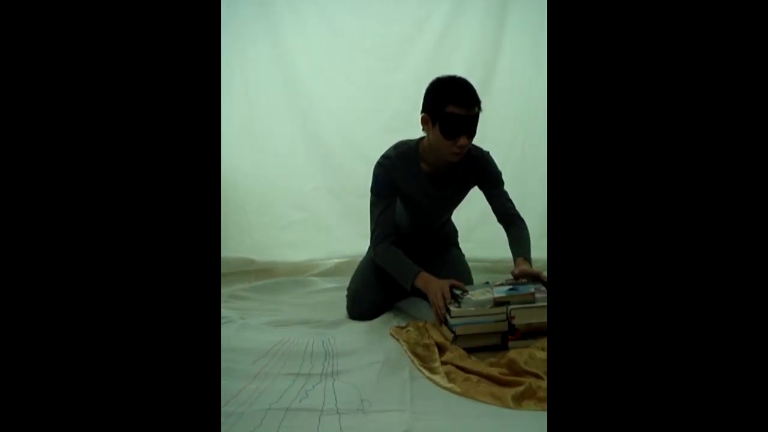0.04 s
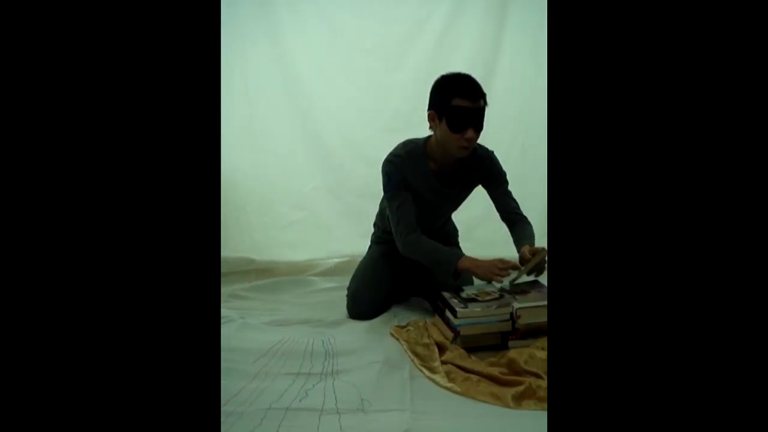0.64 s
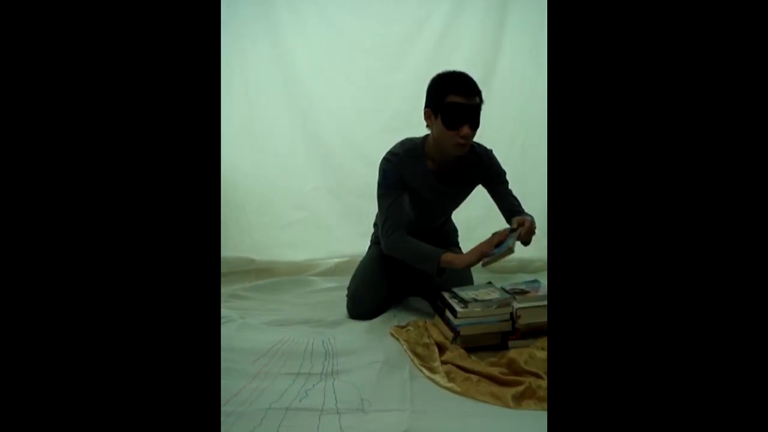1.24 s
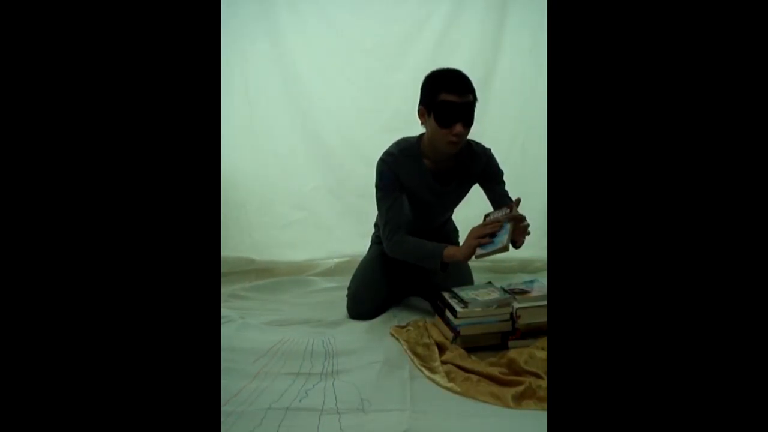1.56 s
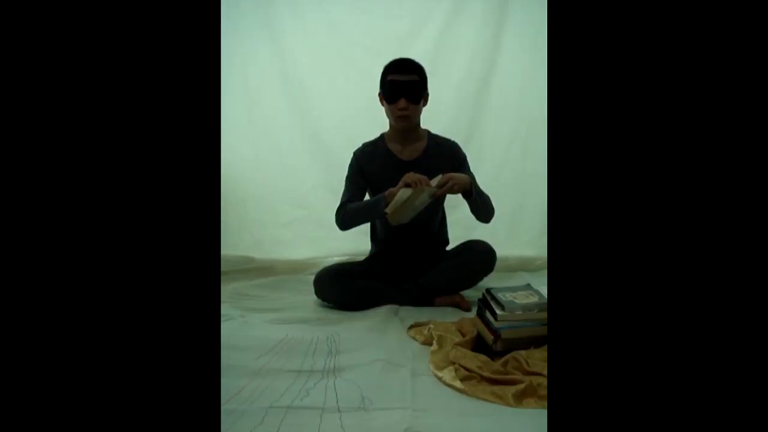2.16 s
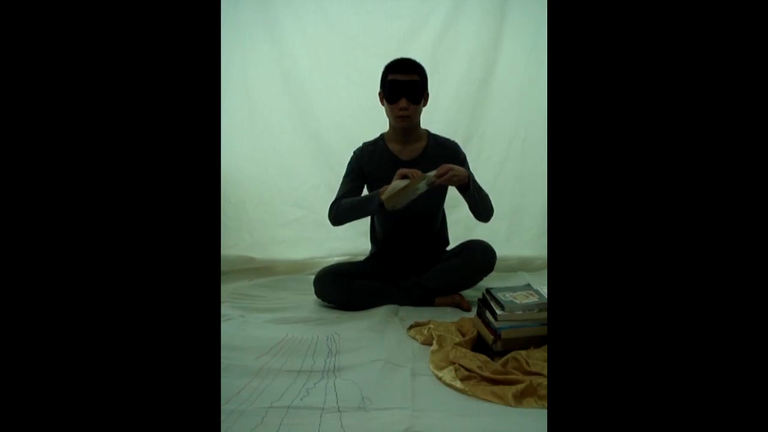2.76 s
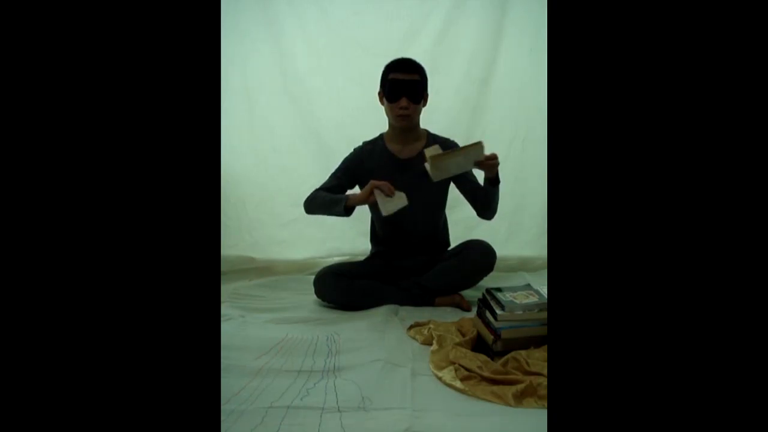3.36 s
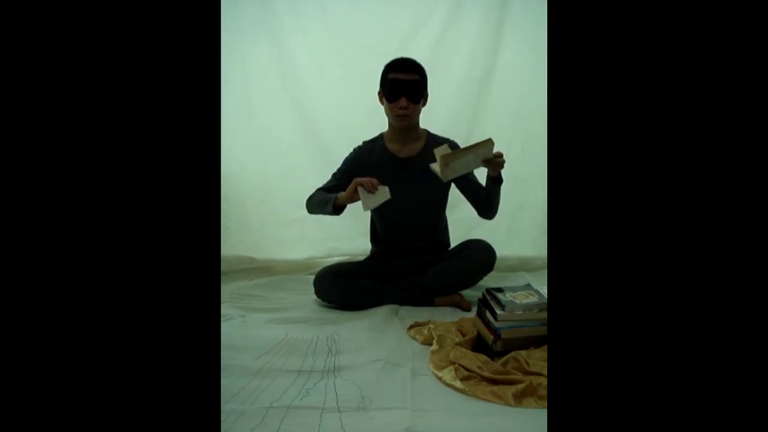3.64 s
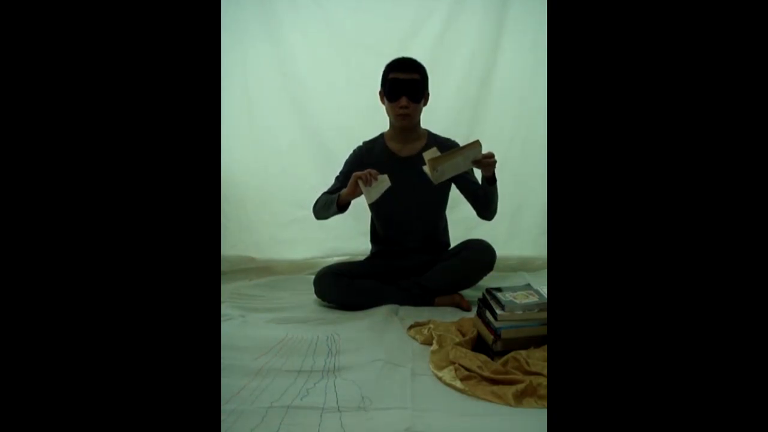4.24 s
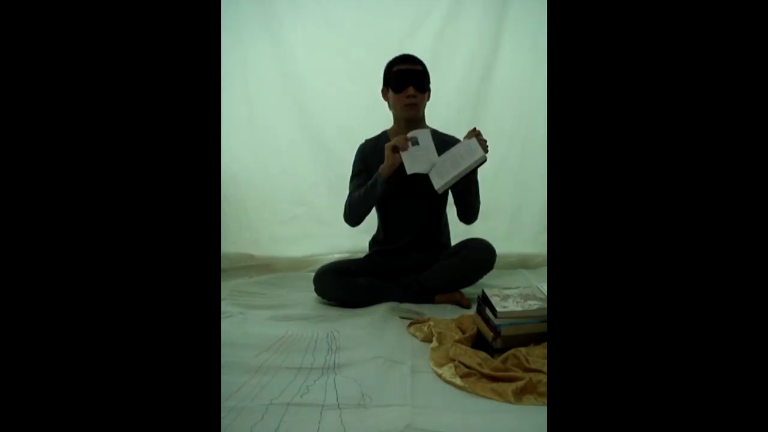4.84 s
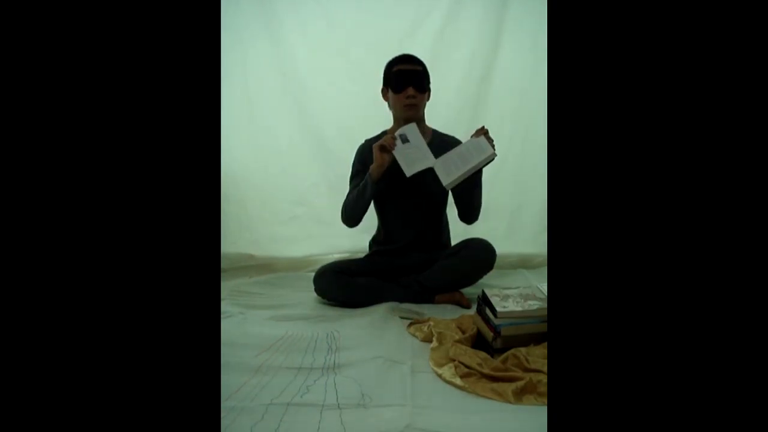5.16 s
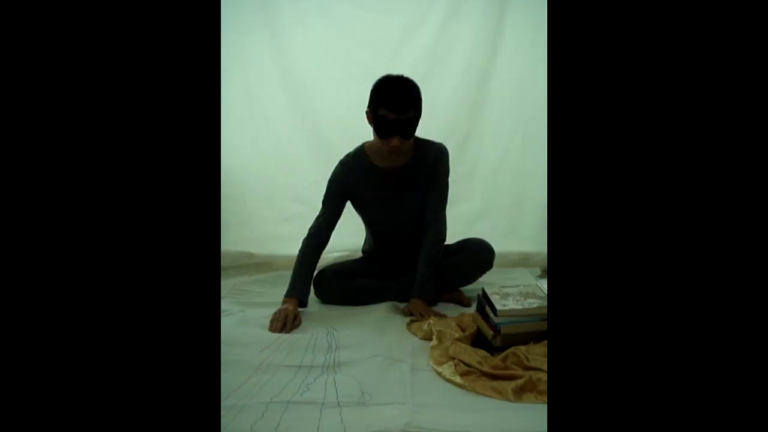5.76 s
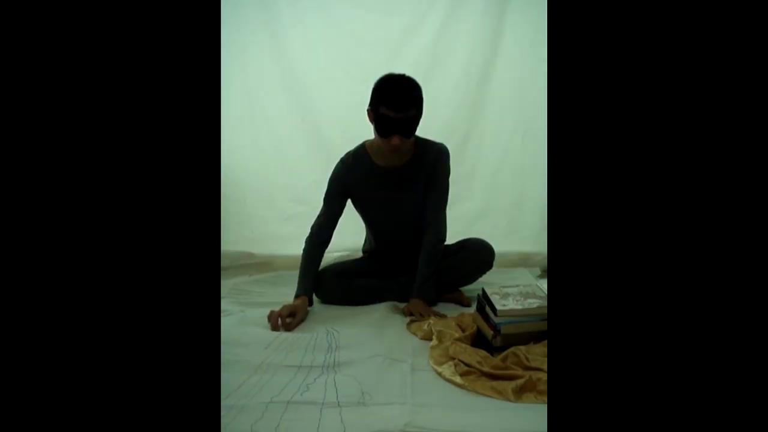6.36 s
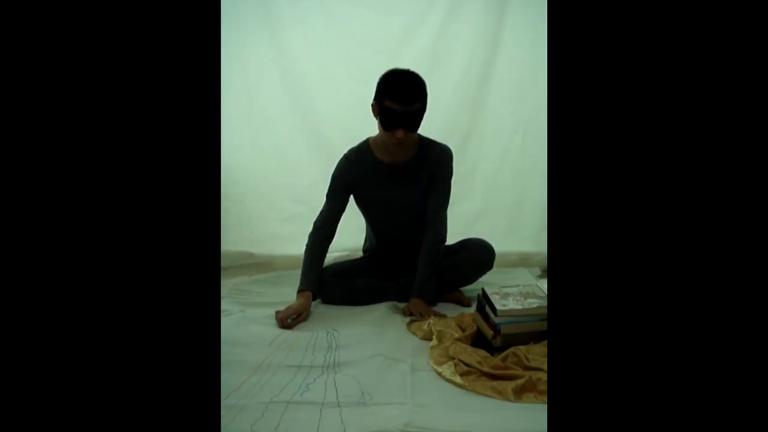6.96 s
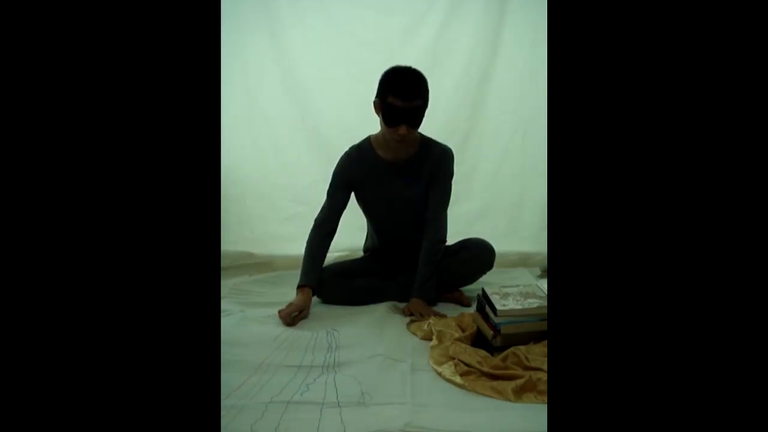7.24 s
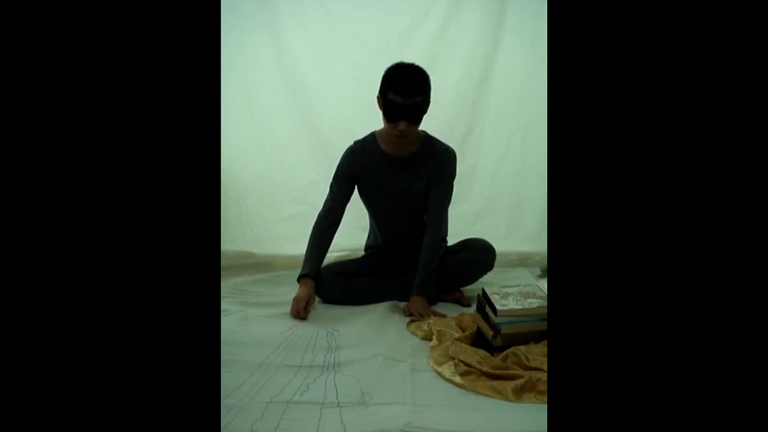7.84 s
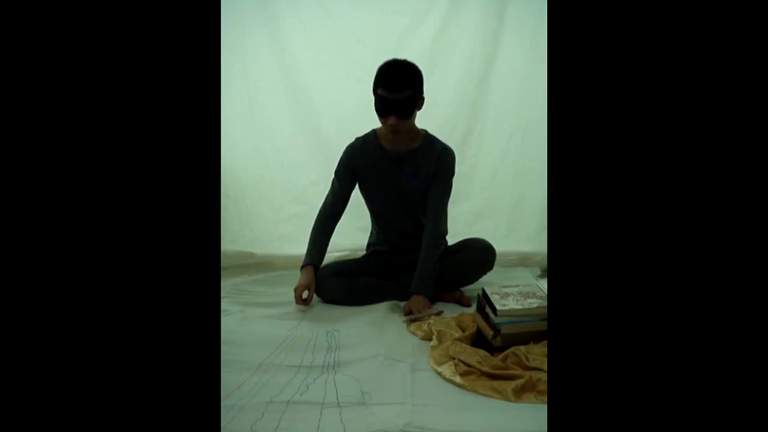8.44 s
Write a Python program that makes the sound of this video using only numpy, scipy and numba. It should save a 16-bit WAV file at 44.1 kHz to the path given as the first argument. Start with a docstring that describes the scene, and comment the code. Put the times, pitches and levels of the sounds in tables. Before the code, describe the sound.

In a small, bare room, a hand bumps softly on a cloth-covered floor. A book's binding cracks sharply and a wad of pages rips away with a harsh rasp. After a pause, a single leaf snaps and tears more quietly. The hand then bumps harder, juddering with a few short squeaks, before the knocks grow lighter. The microphone picks up a short echo and faint hiss and hum throughout.

```python
"""Pages are torn out of a book in a small, bare room: the binding snaps, a wad rips away, then one leaf.
Breaking fibres rasp and shake the loose flap of paper, whose ringing pitch moves as the rip runs on.
A hand bumps the cloth-covered floor, softly at first; after the tearing it bumps harder and judders,
with short squeaks. A faint room hiss and hum lie under it all."""
import sys
import numpy as np
from scipy import signal
from scipy.fft import rfft, irfft
from scipy.io import wavfile
from numba import njit

SR = 44100
rng = np.random.default_rng(int(sys.argv[2]) if len(sys.argv) > 2 else 0)


def to_wav(sig):
    """Store sig (one row per channel, or 1-D mono) as 16-bit WAV at the path in sys.argv[1].

    Samples outside -1..1 are clipped; the rate is SR.
    """
    pcm = np.clip(np.atleast_2d(sig), -1, 1) * 32767
    pcm = np.round(pcm).astype(np.int16)
    wavfile.write(sys.argv[1], SR, pcm.T)  # frames by channels


N = 384111
T = np.arange(N) / SR

# how long the room's echo takes to fade by 60 dB: pitch_hz, fade_s
ECHO_FADE = [(150, 0.43), (500, 0.43), (1000, 0.39), (2100, 0.43), (3600, 0.36), (9000, 0.27)]


def undb(db):
    """Turn decibels into a number to multiply by."""
    return 10 ** (np.asarray(db) / 20)


def unit(x):
    """Scale x to an average strength (rms) of 1."""
    return x / np.sqrt(np.mean(x ** 2) + 1e-20)


def along(points, hz):
    """Read a value between (pitch_hz, value) points, with octaves evenly spaced."""
    pitches, values = np.transpose(points)
    return np.interp(np.log(hz + 1), np.log(pitches), values)


def response(points, size=2048):
    """A click of peak 1 with the tone colour given by (pitch_hz, level_db) points."""
    hz = np.arange(size // 2 + 1) * SR / size
    cepstrum = irfft(np.log(undb(along(points, hz))))
    cepstrum[1:size // 2] *= 2  # this line and the next move the energy to the click's start
    cepstrum[size // 2 + 1:] = 0
    click = irfft(np.exp(rfft(cepstrum)))
    return click / np.abs(click).max()


def ring(x, click):
    """Let every sample of x set off a copy of the click or echo."""
    return signal.oaconvolve(x, click)[:len(x)]


def colour(x, points):
    """Give x a tone colour, at strength 1."""
    return unit(ring(x, response(points)))


def add(out, start_s, x):
    """Mix x into out from start_s on."""
    i = max(int(start_s * SR), 0)
    out[i:i + len(x)] += x[:max(N - i, 0)]


def wander(rate_hz, size=4096):
    """A random curve of strength 1 that heads for a new value rate_hz times a second."""
    return unit(np.interp(T * rate_hz, np.arange(size), rng.standard_normal(size)))


def flip(x):
    """Point every sample up or down at random."""
    return np.where(rng.random(N) < .5, x, -x)


def swell(t, rise_s):
    """A soft push that peaks at 1 after rise_s and dies away."""
    return t / rise_s * np.exp(1 - t / rise_s)


def stroke(length_s, release_s, build_share=0.13):
    """The force of one stroke: it builds, holds until length_s and dies away."""
    t = T[:int((length_s + 10 * release_s) * SR)]
    build = np.minimum(t / (build_share * length_s), 1)
    return build * np.exp(-np.maximum(t - length_s, 0) / release_s)


@njit
def resonance(x, hz, width):
    """Keep the part of x near a moving pitch; width is a share of that pitch."""
    out = np.empty(len(x))
    band, low = 0., 0.
    for i in range(len(x)):
        tuning = np.tan(np.pi * hz[i] / SR)
        swing = (band + tuning * (x[i] - low)) / (1 + tuning * (tuning + width))
        band = 2 * swing - band
        low += 2 * tuning * swing
        out[i] = width * swing
    return out


def fibres(per_second, spread_db, catch_db):
    """Fibres break at random, most small and a few large, unevenly as the rip catches and runs."""
    breaks = rng.random(N) < per_second / SR
    size_db = spread_db * np.minimum(rng.exponential(size=N), 4) + catch_db * wander(260)
    return flip(breaks * undb(size_db))


def air():
    """Steady room hiss with a few faint, wavering hum tones."""
    # tone colour of the hiss: pitch_hz, level_db
    hiss_colour = [(15, -75), (25, -35.5), (48, -15), (195, -6), (221, -8), (257, -6.5), (384, -3.5),
                   (458, -6.5), (603, -8.5), (651, -8.5), (737, -8), (1770, -14.5), (2280, -16),
                   (7590, -21.5), (10000, -27), (13000, -112), (22000, -120)]
    # tones of the hum: pitch_hz, level_db
    hum_tones = [(59, -79.5), (226, -70), (377, -82), (598, -70), (7570, -89)]
    hiss = undb(-55.86) * colour(rng.standard_normal(N), hiss_colour)
    waver = undb(2 * wander(12))
    hum = np.zeros(N)
    for pitch_hz, level_db in hum_tones:
        cycles = np.cumsum(pitch_hz + 5 * wander(30)) / SR
        hum += undb(level_db) * unit(np.sin(2 * np.pi * cycles))
    return hiss + waver * hum


def echo_tail(size=32768):
    """One random wash of echoes with energy 1; each pitch range dies at its own pace."""
    t, hz = T[:size], np.arange(size // 2 + 1) * SR / size
    spectrum = rfft(rng.standard_normal(size))
    edges_hz = [0, 200, 400, 800, 1600, 2800, 4500, 7000, SR / 2]
    tail = np.zeros(size)
    for low, high in zip(edges_hz, edges_hz[1:]):
        band = irfft(spectrum * ((hz >= low) & (hz < high)))
        tail += band * undb(-60 * t / along(ECHO_FADE, (low + high) / 2))
    tail *= np.clip((t - .003) / 0.00076, 0, 1)  # silent for the first 3 ms
    return tail / np.sqrt(np.sum(tail ** 2))


def room(x, tail_db=-1.0, wall_db=-17.0, wall_s=.006, sway_hz=17, tails=3):
    """The room adds a first echo off a wall, its own ringing notes and a wash of later echoes."""
    # standing waves, the notes that ring between the walls: pitch_hz, level_db
    room_notes = [(254, 18), (481, 8.5), (819, -12), (1031, 14.5), (1248, 8), (1367, 9), (1636, 8),
                  (1843, 5.5), (1956, 8), (2241, 5), (2453, 9), (2591, 2.5), (2664, -3), (2875, 5),
                  (2984, 6.5), (3358, 4)]
    t = T[:SR // 2]
    echo = np.zeros(len(t))
    echo[0] = 1  # the direct sound
    add(echo, wall_s, undb([wall_db]))
    for pitch_hz, level_db in room_notes:
        damping = np.log(1000) / along(ECHO_FADE, pitch_hz)
        note = np.exp(-damping * t) * np.cos(2 * np.pi * pitch_hz * t)
        echo += undb(level_db) * 2 * damping / SR * note
    out = ring(x, echo)
    # flapping paper and moving hands keep changing which echoes they feed
    for k in range(tails):
        share = (1 + np.cos(2 * np.pi * (sway_hz * T + k / tails))) / tails
        out += undb(tail_db) * ring(x * np.sqrt(share), echo_tail())
    return out


def sliding():
    """Cloth and paper hiss as they slide."""
    # sliding strokes: start_s, length_s, level_db
    slides = [(2.255, 0.051, -58), (6.391, 0.025, -41), (7.695, 1., -66), (8.573, 0.043, -59)]
    # tone colour of their hiss: pitch_hz, level_db
    slide_colour = [(1000, -4), (3500, -14.5), (4800, -0.5), (5700, 1.5), (6600, -3.5), (7800, -9.5),
                    (10000, -30)]
    loudness = np.zeros(N)
    for start_s, length_s, level_db in slides:
        add(loudness, start_s, undb(level_db - 2.8) * stroke(length_s, release_s=0.01))
    return loudness * colour(fibres(5000, spread_db=1.8, catch_db=1.0), slide_colour)


def skin_squeaks(sag_share=0.15, waver_share=0.057):
    """Skin sticks and slips on the floor in unsteady squeaks whose pitch sags as the pressure goes."""
    # squeaks: start_s, length_s, pitch_hz, level_db
    squeaks = [(6.387, 0.023, 1089, -29), (6.431, 0.019, 1100, -30.5), (6.511, 0.015, 1187, -40)]
    out = np.zeros(N)
    waver = 1 + waver_share * wander(300)
    for start_s, length_s, pitch_hz, level_db in squeaks:
        force = stroke(length_s, release_s=0.0071)
        hz = pitch_hz * (1 - sag_share * (1 - force)) * waver[int(start_s * SR):][:len(force)]
        tone = np.sqrt(2) * np.sin(2 * np.pi * np.cumsum(hz) / SR)
        add(out, start_s, undb(level_db - 8) * force * tone)
    return out * undb(wander(220))  # the level flutters by about 1 dB


def hand_touches(gap_s=.011, end_fade_db=11.5, scatter_db=1, scatter_octaves=0.21, repeats=7):
    """A juddering hand lands, then touches again and again, ever more lightly."""
    # bumps of the hand: start_s, judder_s, level_db, pitch_hz, knock_db, scuff_db
    bumps = [(0.418, 0.01, -41.5, 398, -13, -13), (1.154, 0.013, -41, 385, -10, -22),
             (1.692, 0.02, -41, 388, -11, -15), (1.819, .015, -42, 393, -8, -12),
             (3.962, .02, -44, 387, -10, -15), (4.521, 0.0061, -44, 334, -9, -20),
             (6.188, 0.024, -22.5, 382, -8.5, -11.5), (6.212, 0.031, -27, 261, -2, -13.5),
             (6.331, 0.066, -32, 470, -3.5, -23), (6.39, 0.041, -25, 500, -11, -24),
             (6.467, 0.05, -27, 446, -0.5, -12.5), (6.582, 0.043, -30.5, 440, -18, -24),
             (6.626, 0.054, -32, 590, -4, -25), (6.706, 0.041, -29, 410, -11.5, -28),
             (7.172, 0.062, -36, 450, -20, -25), (7.269, 0.087, -37, 433, -15, -37),
             (7.68, 0.082, -42, 415, -16, -20), (7.786, 0.017, -35, 480, -19, -24),
             (8.223, 0.045, -37.5, 463, -15, -22), (8.589, 0.025, -42, 460, -20, -8)]
    for start_s, judder_s, level_db, pitch_hz, knock_db, scuff_db in bumps:
        yield start_s, level_db, pitch_hz, knock_db, scuff_db
        delay_s = 0
        for gap_luck, level_luck, pitch_luck in rng.standard_normal((repeats, 3)):
            delay_s += gap_s * np.exp(0.253 * gap_luck)
            fade_db = end_fade_db * (delay_s / judder_s) ** 2
            if fade_db < 40:
                touch_db = level_db - fade_db + scatter_db * level_luck
                touch_hz = pitch_hz * 2 ** (scatter_octaves * pitch_luck)
                yield start_s + delay_s, touch_db, touch_hz, knock_db, scuff_db


def hand_bumps(low_cut_hz=230):
    """Every touch is a short, soft thud with a knock and a scuff of cloth."""
    # tone colour of the hand's knock: pitch_hz, level_db
    knock_colour = [(100, -30), (300, -18), (600, 1), (820, 7.5), (1000, -1.5), (1200, -6), (1500, -5),
                    (3000, -40.5)]
    # tone colour of the cloth's scuff: pitch_hz, level_db
    scuff_colour = [(900, -6.5), (1600, -1), (2300, 0), (3200, -8), (5000, -6), (7500, -15), (10000, -22)]
    thuds, knocks, scuffs = np.zeros((3, N))
    t = T[:SR // 8]
    for start_s, level_db, pitch_hz, knock_db, scuff_db in hand_touches():
        push_s = 0.0015 * np.sqrt(450 / pitch_hz)  # a slower push goes with a deeper thud
        add(thuds, start_s, undb(level_db - 5.5) * swell(t, push_s) * np.sin(2 * np.pi * pitch_hz * t))
        add(knocks, start_s, undb(level_db + knock_db - 9.5) * swell(t, rise_s=0.0037))
        add(scuffs, start_s, undb(level_db + scuff_db - 9) * swell(t, rise_s=0.0049))
    thuds = signal.sosfilt(signal.butter(4, low_cut_hz, "high", fs=SR, output="sos"), thuds)
    knocks *= colour(rng.standard_normal(N), knock_colour)
    scuffs *= colour(rng.standard_normal(N), scuff_colour)
    return thuds + knocks + scuffs


def binding_snaps():
    """Glue, thread and paper edges snap: one sharp crack, then a dying crackle of smaller breaks."""
    # snaps: start_s, level_db, crackle_db, decay_s, low_cut_hz (higher for thin paper)
    snaps = [(2.3785, -13, -10, 0.009, 300), (2.579, -43, -0.5, 0.019, 800), (2.782, -33, -5, 0.02, 300),
             (2.994, -11.5, -24, 0.014, 300), (4.758, -34, -12, .01, 3000),
             (4.7886, -18.5, -14, 0.0056, 4000), (5.0039, -32, -16, .01, 2000),
             (5.136, -39, -11, 0.018, 300)]
    # tone colour of a snap: pitch_hz, level_db
    snap_colour = [(100, -34), (400, -9), (1200, -4), (2000, 3), (2800, 1), (4200, 5), (5200, -2),
                   (6800, -0.5), (8200, -7.5), (10000, -15)]
    out, t = np.zeros(N), T[:SR // 5]
    crack = response(snap_colour)
    small_breaks = colour(fibres(1400, spread_db=2.1, catch_db=0.84), snap_colour)
    for start_s, level_db, crackle_db, decay_s, low_cut_hz in snaps:
        crackle = small_breaks[int(start_s * SR):][:len(t)]
        snap = undb(crackle_db - 5.5) * crackle * np.exp(-t / decay_s)
        add(snap, 0, crack)
        low_cut = signal.butter(1, low_cut_hz, "high", fs=SR)
        add(out, start_s, undb(level_db) * signal.lfilter(*low_cut, snap))
    return out


def tear(pulls, breaks, release_s, flap_db, flap_width, sheet_db):
    """In each pull, breaking fibres rasp, shake the sheet and ring the loose flap at a gliding pitch."""
    # tone colour of breaking fibres: pitch_hz, level_db
    rasp_colour = [(100, -33), (300, -30.5), (700, -8), (1200, -17), (2500, -2.5), (3300, -2.5),
                   (4300, 0.5), (5300, 1), (6700, -0.5), (8000, -4.5), (10000, -15)]
    # tone colour of the whole shaken sheet: pitch_hz, level_db
    sheet_colour = [(50, -28), (130, -5), (240, -16.5), (350, 7.5), (520, -2.5), (720, 8.5), (1000, -2),
                    (1500, 2.5), (4000, -29.5)]
    paper_gain, flap_gain = np.zeros((2, N))
    flap_hz = np.full(N, float(pulls[0][4]))  # begins at the first pull's pitch
    for start_s, length_s, level_db, swell_db, from_hz, to_hz, flap_boost_db in pulls:
        force = stroke(length_s, release_s)
        progress = np.minimum(T[:len(force)] / length_s, 1)
        force *= undb(level_db + swell_db * (progress - .5))
        add(paper_gain, start_s, force)
        add(flap_gain, start_s, force * undb(flap_boost_db + flap_db))
        flap_hz[int(start_s * SR):][:len(force)] = from_hz + (to_hz - from_hz) * progress
    flap = resonance(flip(breaks), flap_hz, flap_width)
    flap = unit(resonance(flap, flap_hz, flap_width))  # a second pass sharpens the pitch
    rasp = colour(breaks, rasp_colour)
    sheet = undb(sheet_db) * colour(flip(breaks), sheet_colour)
    return undb(-2.5) * (paper_gain * (rasp + sheet) + flap_gain * flap)


def scene():
    """Paper, binding and hand share one room."""
    # pulls on the wad of pages: start_s, length_s, level_db, swell_db, from_hz, to_hz, flap_boost_db
    wad_pulls = [(2.735, 0.037, -45.5, -3, 1460, 1600, 6), (2.774, 0.037, -33, 2, 1900, 1720, -5),
                 (2.852, 0.088, -32, 2, 1460, 1060, 3.5), (2.945, 0.22, -28.5, -6, 1620, 1450, -2.5),
                 (3.16, 0.073, -25, 6.5, 2100, 2290, -4), (3.24, 0.16, -24, -3.5, 2430, 1820, 0.5)]
    # pulls on the single leaf: same columns
    leaf_pulls = [(4.755, 0.022, -50.5, -8, 1500, 1500, -11), (4.936, 0.018, -46, 4, 1500, 1500, -19),
                  (4.957, 0.08, -40, 2, 1500, 1400, -9.5), (5.132, 0.042, -43.5, 3, 1450, 1460, -8),
                  (5.185, 0.13, -36.5, -1, 1520, 1500, -4), (5.328, 0.069, -34.5, 2, 1540, 1640, -0.5),
                  (5.415, 0.024, -48.5, -8, 1580, 1490, 16.5)]
    wad_breaks = fibres(3500, spread_db=3.1, catch_db=2.3)
    wad = tear(wad_pulls, wad_breaks, release_s=0.013, flap_db=-2.94, flap_width=0.77, sheet_db=-15)
    leaf_breaks = fibres(3200, spread_db=3.7, catch_db=2.3)
    leaf = tear(leaf_pulls, leaf_breaks, release_s=0.01, flap_db=-2.5, flap_width=1.0, sheet_db=-5)
    hand = hand_bumps() + skin_squeaks() + sliding()
    return (room(wad + leaf + binding_snaps() + hand) + air())[None]


def record(dry):
    """Cut the highest treble steeply."""
    top_hz = 10230
    return signal.sosfilt(signal.ellip(12, .2, 75, top_hz, fs=SR, output="sos"), dry)


dry = scene()
out = record(dry)
to_wav(out)
```